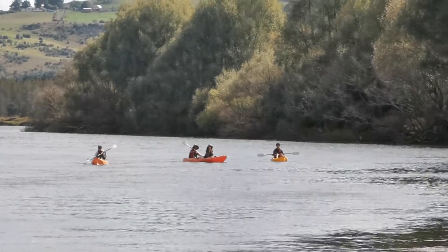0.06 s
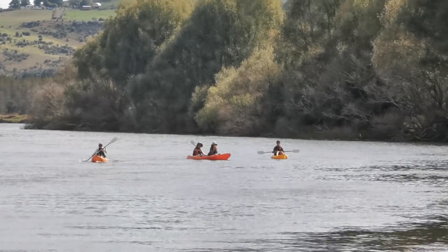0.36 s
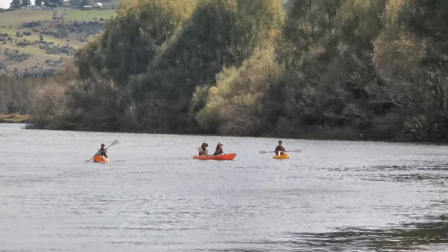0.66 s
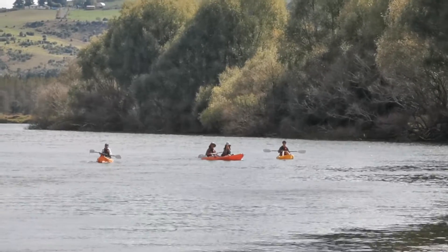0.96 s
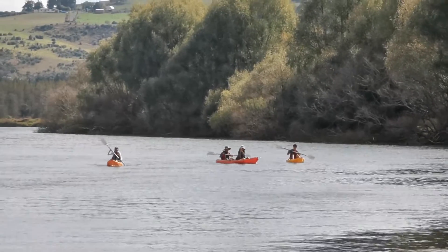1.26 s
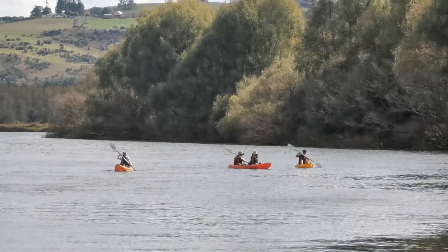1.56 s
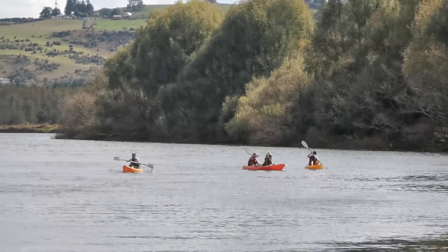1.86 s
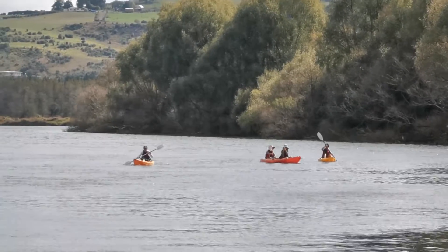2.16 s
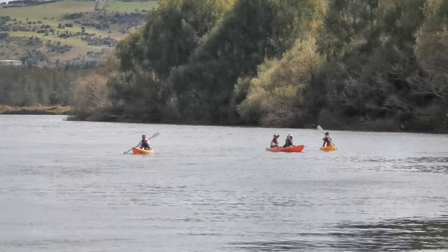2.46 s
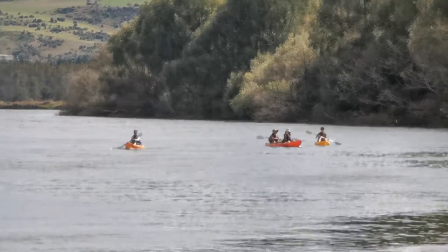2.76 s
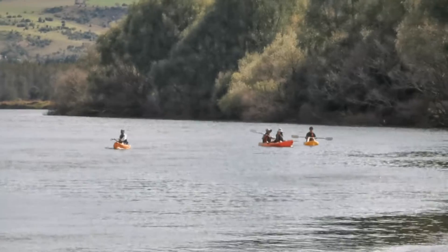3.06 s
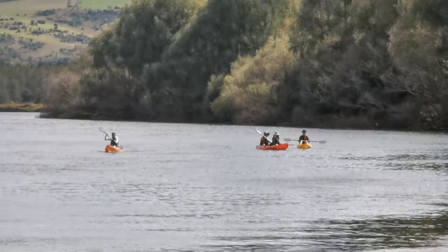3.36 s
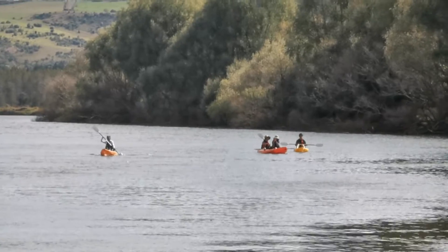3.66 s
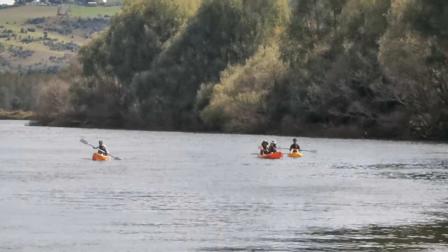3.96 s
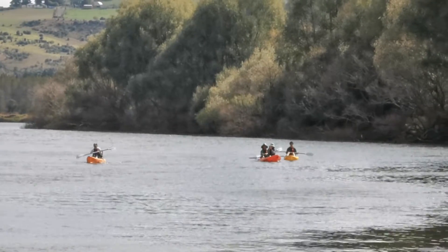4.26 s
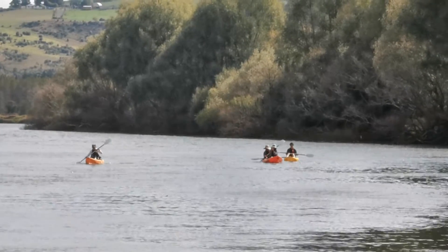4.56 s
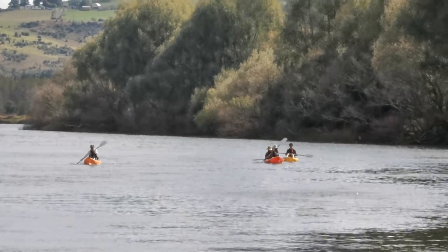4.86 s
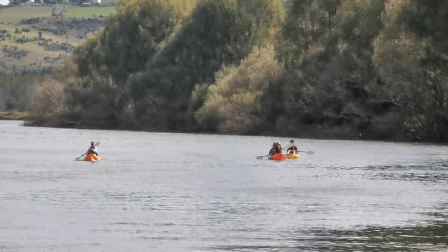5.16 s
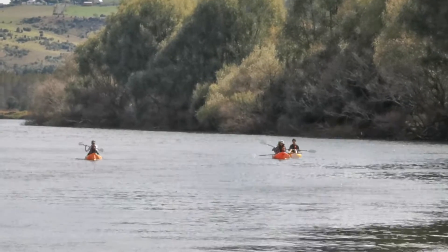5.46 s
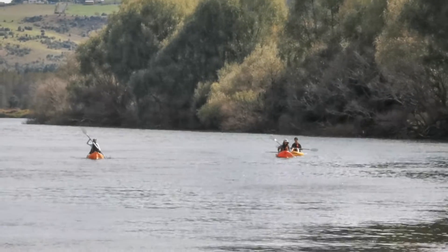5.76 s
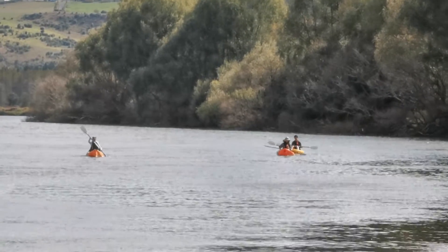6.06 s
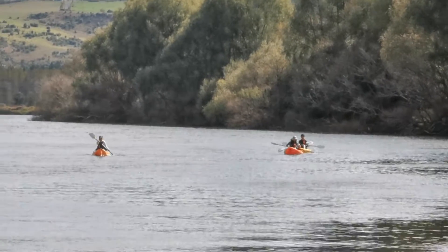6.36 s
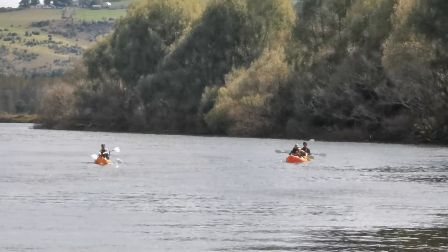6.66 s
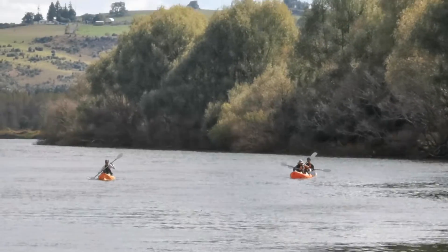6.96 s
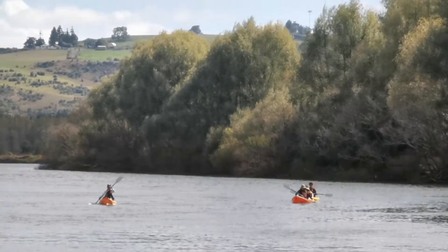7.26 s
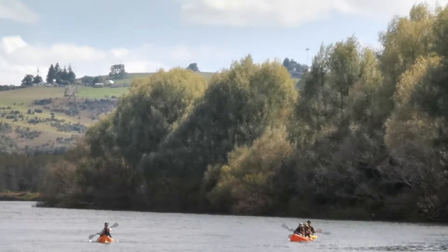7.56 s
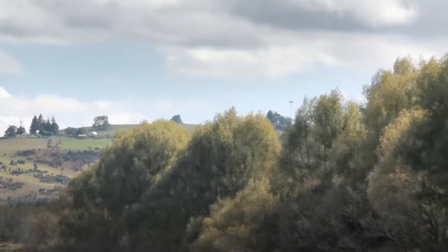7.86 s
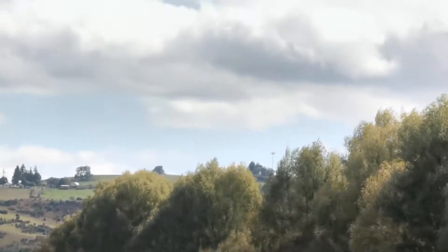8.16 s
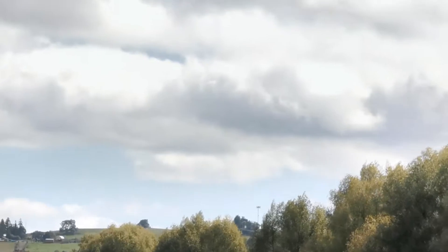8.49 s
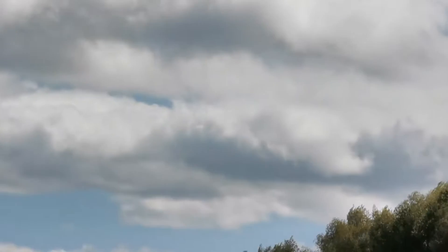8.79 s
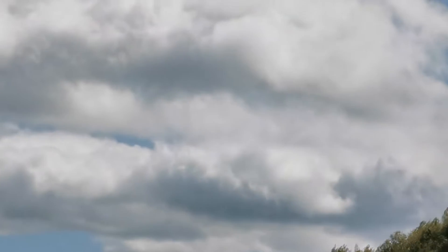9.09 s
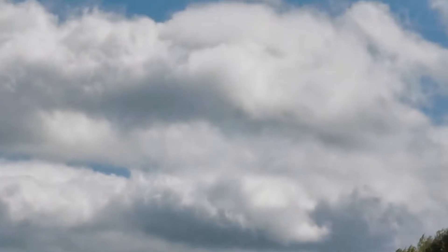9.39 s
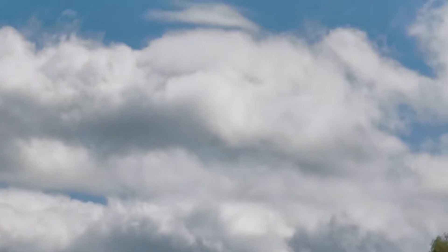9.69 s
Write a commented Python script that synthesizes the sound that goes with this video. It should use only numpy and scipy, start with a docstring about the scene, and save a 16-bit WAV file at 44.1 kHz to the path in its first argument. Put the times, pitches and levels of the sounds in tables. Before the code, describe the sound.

Gulls call one after another over a river, their harsh, raspy cries rising and falling in pitch and often overlapping, with a light echo from the wooded banks. Wind rumbles on the microphone, strongest in the first few seconds, above a faint, even wash of water and leaves. Toward the end, the low hum of a distant motor swells in with a soft rush while the gulls keep crying.

```python
"""Gulls cry one after another over a river, each cry a harsh arch of pitch, often overlapping the next.
The syrinx whistles while a flutter modulates its amplitude, chopping the tone into about 50-110 chirps
a second, with half-pitch lines and rasp. The throat filters the cry; water and banks reflect it.
Turbulent wind rumbles on the microphone over a wash of water and leaves and a dull, far rush.
Late on, the hum of a distant motor swells."""
import sys
import numpy as np
from scipy import signal
from scipy.fft import rfft, irfft, next_fast_len
from scipy.io import wavfile
from scipy.ndimage import uniform_filter1d

SR = 44100
rng = np.random.default_rng(int(sys.argv[2]) if len(sys.argv) > 2 else 0)


def dump(signal):
    """Clip the signal to [-1, 1] and save it as 16-bit WAV at the path in sys.argv[1]."""
    limited = np.clip(np.atleast_2d(signal).T, -1, 1)
    pcm = np.round(limited * 32767).astype(np.int16)
    wavfile.write(sys.argv[1], SR, pcm)


N = 429093
T = np.arange(N) / SR

# pitch contour of each cry, first moment to last: (time [s], pitch [Hz])
CRY_PITCHES = [
    [(0, 1543), (.1, 1414), (.25, 1328)],
    [(.17, 1016), (.45, 1086), (.56, 930)],
    [(.133, 1772), (.3, 1817), (.39, 1750), (.47, 1435), (.58, 1329), (.665, 1110)],
    [(1.238, 1484), (1.53, 1663), (1.8, 1263), (2.12, 1122)],
    [(1.951, 1291), (2.26, 1530), (2.45, 1367), (2.61, 1126)],
    [(2.637, 1254), (2.73, 1506), (2.88, 1535), (3.0, 1346), (3.05, 1086), (3.16, 954)],
    [(3.272, 1488), (3.36, 1690), (3.46, 1450)],
    [(3.33, 1277), (3.5, 1418), (3.67, 1344), (3.77, 1118), (3.87, 1052), (3.97, 960)],
    [(3.8, 1453), (3.93, 1726), (4.15, 1619), (4.31, 1325)],
    [(4.19, 1356), (4.42, 1346), (4.55, 1270), (4.63, 1170)],
    [(4.508, 963), (4.6, 1320), (4.73, 1401), (4.83, 1082), (4.93, 1012), (5.0, 870)],
    [(5.123, 1493), (5.25, 1580), (5.45, 1513), (5.56, 1154)],
    [(5.495, 1087), (5.59, 1419), (5.72, 1512), (5.9, 1298), (6.08, 1058)],
    [(5.965, 1383), (6.1, 1517), (6.27, 1580), (6.38, 1450), (6.48, 1285)],
    [(6.0, 1128), (6.12, 1251), (6.56, 1221), (6.69, 995)],
    [(6.56, 1241), (6.72, 1477), (6.84, 1402), (6.93, 1096), (7.03, 1033), (7.1, 824)],
    [(7.132, 1351), (7.25, 1290), (7.3, 1405), (7.47, 1390), (7.53, 1163), (7.68, 1040)],
    [(7.815, 1095), (7.95, 1438), (8.12, 1426), (8.25, 1287), (8.42, 1178), (8.66, 1137)],
    [(7.96, 1407), (8.22, 1600), (8.29, 1536), (8.36, 1348), (8.53, 1156)],
    [(8.9, 1185), (9.07, 1250), (9.15, 1430), (9.35, 996)],
]
# voice of each cry, in the same order: (swell time [s], relative level [dB],
#   level change once the pitch drops [dB], boost of third partial over second while held [dB],
#   the same once dropped [dB], shrillness [dB/octave], half-pitch lines [dB],
#   opening screech [s], rasp after it [0-1])
CRY_VOICES = [ (0.006, -39, 0, -5.5, 25, 9, -14, 0.02, 0.1),
              (0.025, -46, 12, -19, -26, 2, -28, 0.025, 0.15),
              (0.0082, -39, 1, 0.5, 5, -0.5, -13.5, 0.25, .22), (0.036, -36, 0, 6, -1, -2, -18, 0.28, 0.3),
              (0.0085, -37.5, 1.5, 6.5, 3, -7.5, -23.5, 0.34, .2),
              (0.06, -34, -9, -7, -4.5, -8.5, -14, 0.019, 0.4),
              (0.063, -34, 9, -11, -10, -10, -2, 0.29, 0.8), (0.16, -36, -3, -4.5, 0, -8.5, -19, 0.14, 0.3),
              (0.046, -34, -1.5, -1.5, -2, -8.5, -18, 0, .3),
              (0.063, -35, -14, 4, -3, -5, -10.5, 0.03, 0.33),
              (0.067, -41, 0.5, -5.5, -19, -24.5, -12, 0.06, 0.09),
              (0.03, -41.5, 10, 0.5, -9, -20, -12.5, 0, 0.25),
              (0.032, -37, -5, -6.5, -11, -17, -9.5, 0.07, .14),
              (0.072, -36.5, -5, -2, -4, -2, -5, 0.07, 0.3),
              (0.05, -41, 0, -6, -18, -12.5, -28, 0.023, 0.5),
              (0.15, -42, -2, -5, -9.5, -13, -11, 0.033, 0.15),
              (0.028, -38, -4.5, 5.5, -6, -6.5, -10.5, 0, .25),
              (0.039, -35.5, -9, 8.5, -12, -7.5, -15, 0, .35),
              (0.045, -33, -6, 1.5, 3, 1.5, -12, 0.023, 0.5), (0.11, -46.5, -5, 2.5, 2, -15, -8, .1, 0.4), ]
# resonances of throat and beak: (frequency [Hz], gain [dB])
THROAT_RESPONSE = [(1100, -22.5), (1400, -22.5), (1750, -18.5), (2200, -2.5), (4400, -2), (5400, -9.5),
                   (6900, -8), (8400, -20.5), (10800, -34), (13000, -43.5)]
# delay at the left microphone port, set by each bird's direction: (time [s], lag [ms])
LEFT_LAG = [(2.0, 0.275), (4.2, -0.031), (7.2, -0.00086), (7.9, 0.14)]
# how differently the two ports colour the cries: (frequency [Hz], left minus right [dB])
PORT_BALANCE = [(1300, 1.5), (2400, -4), (4400, 3), (8000, -5), (14000, -21.5)]
# wind on the microphone: (time [s], level [dB])
GUST_LEVELS = [(0, -34), (.65, -35.5), (1.05, -43.5), (1.55, -34), (2.0, -27.5), (2.55, -36), (2.85, -31.5),
               (3.5, -37), (3.87, -35.5), (4.15, -41.5), (5.15, -44), (5.8, -39.5), (6.25, -37), (6.7, -44),
               (8.7, -40), (9.25, -40), (9.5, -57)]
# spectra of the wind's rumble and buffets: (frequency [Hz], relative density [dB])
RUMBLE_SPECTRUM = [(35, 2.5), (70, 2.5), (120, -10), (500, -63)]
BUFFET_SPECTRUM = [(70, 6), (150, 5), (310, -12), (450, -22.5), (1300, -55)]
# single eddies fluttering in the right port: (time [s], frequency [Hz], relative level [dB])
PORT_EDDIES = [(1.8, 414, -43), (2.07, 294, -35.5), (2.35, 247, -38)]
# distant motor: (time [s], hum level [dB], rush level [dB])
MOTOR_LEVELS = [(6.6, -92, -49.5), (7.2, -67, -51.5), (8.1, -53, -45.5), (8.8, -60.5, -50.5),
                (9.5, -50.5, -46.5)]
# far rush: (time [s], level [dB])
FAR_RUSH_LEVELS = [(3.8, -60), (4.6, -70.5), (6.6, -74), (7.1, -56.5), (8.7, -65)]
# spectra of the motor's rush, the river and the far rush: (frequency [Hz], relative density [dB])
MOTOR_SPECTRUM = [(200, 21), (580, -2), (2400, -3)]
RIVER_SPECTRUM = [(150, 1.5), (550, -23), (1000, -29), (2500, -18), (6000, -20), (15000, -27.5)]
FAR_RUSH_SPECTRUM = [(300, -10.5), (600, -5.5), (1000, -20)]


def gulls(direct_db=-6.5, near_db=-3.5, banks_db=-21):
    """Multipath propagation: cries reach two ports with time and level differences, then as echoes."""
    ports = np.zeros((2, N))
    for voice, pitches in zip(CRY_VOICES, CRY_PITCHES):
        start_s, end_s = pitches[0][0], pitches[-1][0]
        span = (T >= start_s) & (T <= end_s)
        age = T[span] - start_s
        spectrum = rfft(cry(voice, pitches, age))
        f = np.fft.rfftfreq(len(age), 1 / SR)
        lag_ms, = curves(LEFT_LAG, start_s)
        delay = np.exp(-2j * np.pi * f * lag_ms / 1000)
        balance = undb(curves(PORT_BALANCE, f)[0] / 2)
        ports[0, span] += irfft(spectrum * delay * balance, len(age))
        ports[1, span] += irfft(spectrum / balance, len(age))
    banks = bank_reverberation(ports)
    return undb(direct_db) * ports + undb(near_db) * near_echoes(ports) + undb(banks_db) * banks


def cry(voice, pitches, age, screech_rasp=.9, clearing_s=.0493, tail_rasp=.14, waver=.006):
    """Timbre follows pitch: a cry may open in a screech, clears, and changes colour as it drops."""
    swell_s, level_db, tail_db, third_db, tail_third_db, shrill_db, half_db, screech_s, rasp = voice
    hz, drop, fade = arch(age, pitches, swell_s)
    screech = np.clip((screech_s - age) / clearing_s, 0, 1)
    rasp = np.clip(rasp + tail_rasp * drop + (screech_rasp - rasp) * screech, 0, 1)
    tilt_db = third_db + (tail_third_db - third_db) * drop
    sound = syrinx(hz * (1 + waver * walk(15, age)), rasp, tilt_db, half_db, age)
    envelope = fade * undb(level_db + tail_db * drop + .78 * walk(11.36, age))
    return beak(sound * envelope, shrill_db)


def arch(age, pitches, swell_s, glide_s=.035, full_drop=.24, release_s=.1):
    """Glide and envelope: the smoothed pitch, its drop from its peak so far (0-1), and the fade."""
    hz, = curves(pitches, pitches[0][0] + age)
    hz = uniform_filter1d(hz, int(glide_s * SR), mode="nearest")
    drop = np.clip((1 - hz / np.maximum.accumulate(hz)) / full_drop, 0, 1)
    fade = np.clip(np.minimum(age / swell_s, (age[-1] - age) / release_s), 0, 1)
    return hz, drop, fade


def syrinx(hz, rasp, tilt_db, half_db, t, chop_ratio=.061, jitter=.015, sweep=.26, shake=.0508, breath=.3):
    """Amplitude modulation: a flutter opens and shuts the whistling syrinx; tension raises both rates."""
    flutter_hz = hz * chop_ratio * (1 + jitter * rasp * walk(90, t))
    cycle = np.cumsum(flutter_hz) / SR % 1
    opening = np.sin(np.pi * cycle ** .58) ** 2  # quick swell, slower fall
    leak = .0652 + .0913 * rasp  # a rasping voice never quite shuts
    gate = unit((leak + opening) * undb(.024 * walk(63, t)))
    # within each opening the tone sweeps up through its pitch and shakes
    chirp = sweep * (.5 + rasp) * (cycle - np.average(cycle, weights=gate ** 2))
    tremor = shake * (.15 + rasp) * walk(1100, t)
    phase = 2 * np.pi * np.cumsum(hz * (1 + chirp + tremor)) / SR
    tone = throat(phase, hz, tilt_db, half_db)
    # turbulent air hisses above the voice
    hiss = butterworth(noise(THROAT_RESPONSE, size=len(t)), 2 * hz.mean(), "high")
    return gate * (tone + breath * rasp ** 1.5 * hiss)


def throat(phase, hz, tilt_db, half_db, rest_hz=1450, follow=.36, fundamental_db=4, upper_db=-2):
    """Source and filter: resonances that partly follow the pitch weight harmonics and half-pitch lines."""
    tone, power = 0, 0
    for k in np.arange(1, 9.5, .5):
        boost_db = half_db if k % 1 else 0
        if k == 1:
            boost_db += fundamental_db
        elif 2 <= k <= 3:
            boost_db += tilt_db * (k - 2.5)
        elif k > 3:
            boost_db += upper_db
        amplitude = gain_at(THROAT_RESPONSE, k * hz * (rest_hz / hz) ** follow) * undb(boost_db)
        tone += amplitude * np.sin(k * phase)
        power += amplitude ** 2 / 2
    return tone / np.sqrt(power)


def beak(sound, shrill_db, edge_hz=4400, body_hz=1900):
    """Radiation from an opening: a wider beak lets out more treble and less of the fundamental."""
    f = np.fft.rfftfreq(len(sound), 1 / SR)
    octaves = np.log2(np.clip(f / edge_hz, 1, 2)) + np.log2(np.clip(f / body_hz, .75, 1))
    return irfft(rfft(sound) * undb(shrill_db * octaves), len(sound))


def near_echoes(sound, t60=.029, shift_hz=14, patterns=5):
    """Early reflections off water and shore: their interference shifts as birds and ripples move."""
    weights = np.array([walk(shift_hz, T) for _ in range(patterns)])
    weights /= np.sqrt(np.sum(weights ** 2, axis=0))
    return sum(w * signal.oaconvolve(sound, scatter(t60, SR // 8), axes=1)[:, :N] for w in weights)


def bank_reverberation(sound, t60=1.0, cutoff_hz=4400):
    """Diffuse reflection: the wooded banks return a dull, decaying tail."""
    tail = signal.fftconvolve(sound, scatter(t60, SR), axes=1)[:, :N]
    return butterworth(tail, cutoff_hz, "low")


def wind(buffet_db=-10, growth=2.03, pivot_db=-40, eddy_s=.053, eddy_width=.13):
    """Turbulent pressure on each port: a rumble, with higher, fluttering buffets in strong gusts."""
    gust_db = curves(GUST_LEVELS, T)[0] + 1.52 * walk(13, T)
    rumble = stereo_noise(RUMBLE_SPECTRUM, shared=.094, pan_db=8.5) * undb(gust_db)
    surge_db = pivot_db + growth * (gust_db - pivot_db) + buffet_db
    buffet = stereo_noise(BUFFET_SPECTRUM, shared=.21, pan_db=1) * undb(surge_db + walk(40, T))
    for time_s, hz, level_db in PORT_EDDIES:
        band_hz = hz * np.exp([-eddy_width, eddy_width])
        eddy = unit(butterworth(rng.standard_normal(N), band_hz, "band"))
        buffet[1] += 2 * eddy * undb(level_db) * np.exp(-((T - time_s) / eddy_s) ** 2)
    return rumble + buffet


def motor(hum_hz=114, waver=.0122, octave_db=-1, shift_db=6):
    """Periodic vibration: a far motor's wavering hum, whose octave takes over late, in a soft rush."""
    hum_db, rush_db = curves(MOTOR_LEVELS, T)
    phase = 2 * np.pi * np.cumsum(hum_hz * (1 + waver * walk(13, T))) / SR
    handover_db = shift_db * np.tanh((T - 9.2) / 1.2)
    fundamental = np.sin(phase) * undb(2 * walk(8.2, T) - handover_db)
    octave = np.sin(2 * phase) * undb(octave_db + handover_db + 2 * walk(13, T))
    rush = stereo_noise(MOTOR_SPECTRUM, shared=.059, pan_db=0)
    return (fundamental + octave) * undb(hum_db) + rush * undb(rush_db)


def river(level_db=-64.5):
    """Broadband noise: water and leaves blend into an even wash."""
    return stereo_noise(RIVER_SPECTRUM, shared=.043, pan_db=-5) * undb(level_db + walk(.85, T))


def far_rush():
    """Slowly modulated noise: a dull rush from far off swells and fades."""
    level_db, = curves(FAR_RUSH_LEVELS, T)
    return stereo_noise(FAR_RUSH_SPECTRUM, shared=.082, pan_db=-4.5) * undb(level_db)


def scatter(t60, size):
    """Exponential decay: a stereo impulse response of dense reflections, with unit energy."""
    ring = rng.standard_normal((2, size)) * undb(-60 * np.arange(size) / SR / t60)
    return ring / np.sqrt(np.sum(ring ** 2, axis=1, keepdims=True))


def stereo_noise(spectrum, shared, pan_db):
    """Partial coherence: both ears share part of the power; positive pan favours the left."""
    separate = np.array([noise(spectrum), noise(spectrum)])
    blend = np.sqrt(shared) * noise(spectrum) + np.sqrt(1 - shared) * separate
    return blend * undb([[pan_db / 2], [-pan_db / 2]])


def noise(spectrum, size=N):
    """Spectral shaping: white noise becomes coloured noise of rms 1."""
    n = next_fast_len(size)
    white = rfft(rng.standard_normal(n))
    return unit(irfft(white * gain_at(spectrum, np.fft.rfftfreq(n, 1 / SR)), n))[:size]


def gain_at(spectrum, hz):
    """Frequency response: interpolated gain, falling 24 dB an octave above the last point."""
    f, db = np.transpose(spectrum)
    return undb(np.interp(np.log(np.maximum(hz, 1)), np.log(f), db)) / np.maximum(hz / f[-1], 1) ** 4


def butterworth(x, hz, kind):
    """Filtering with skirts of 12 dB an octave."""
    return signal.sosfilt(signal.butter(2, hz, kind, fs=SR, output="sos"), x)


def walk(rate, t):
    """Random fluctuation of rms 1, with about rate turns a second."""
    points = rng.standard_normal(len(t))
    return unit(np.interp((t - t[0]) * rate, np.arange(len(points)), points))


def curves(table, x):
    """Linear interpolation of a table's columns along its first."""
    axis, *columns = np.transpose(table)
    return [np.interp(x, axis, column) for column in columns]


def undb(db):
    """Decibels to amplitude ratio."""
    return 10 ** (np.asarray(db) / 20)


def unit(x):
    """Normalisation to rms 1."""
    return x / np.sqrt(np.mean(x ** 2))


def scene():
    """Superposition: gulls over wind, a motor, the river and a far rush."""
    return gulls() + wind() + motor() + river() + far_rush()


def record(dry):
    """Band limiting: a steep low-pass cuts the treble above 15.7 kHz."""
    return signal.sosfilt(signal.ellip(10, .1, 80, 15700, fs=SR, output="sos"), dry)


dry = scene()
out = record(dry)
dump(out)
```